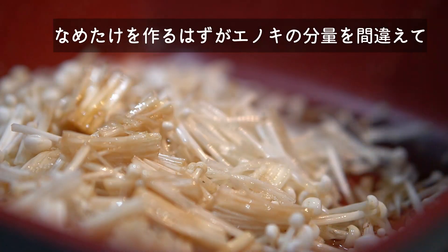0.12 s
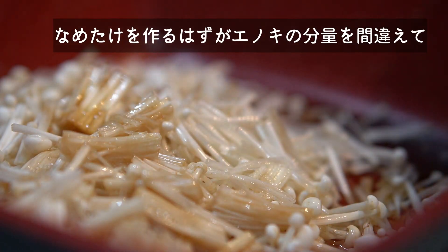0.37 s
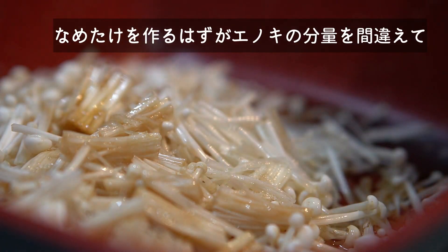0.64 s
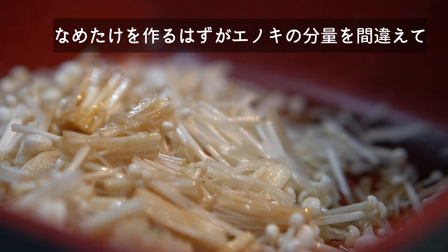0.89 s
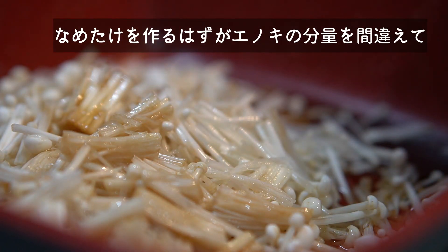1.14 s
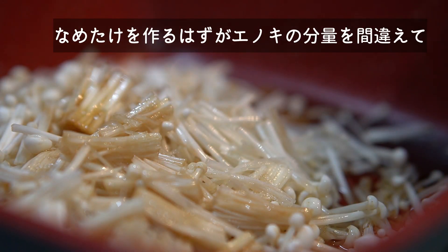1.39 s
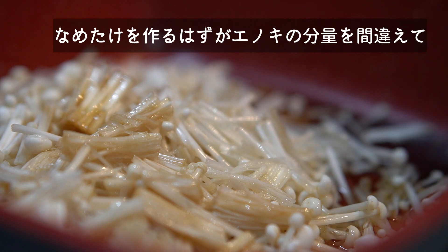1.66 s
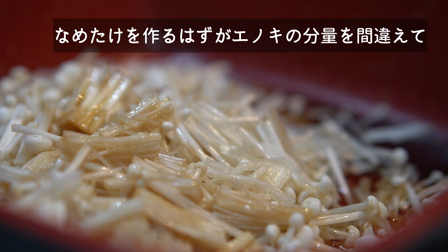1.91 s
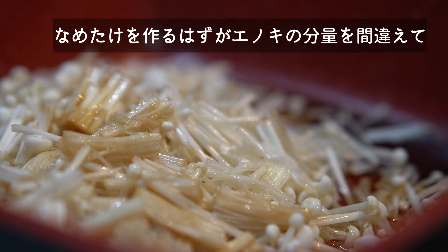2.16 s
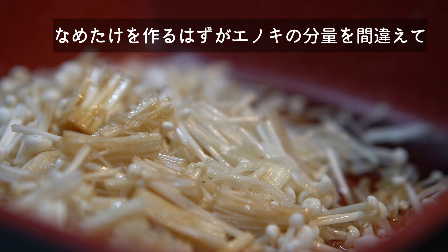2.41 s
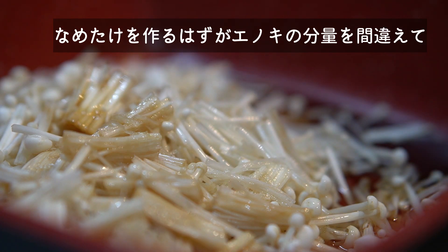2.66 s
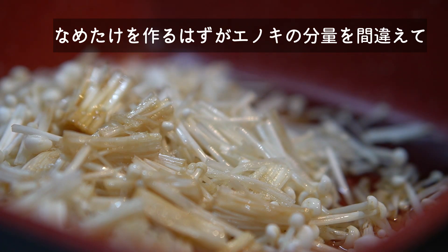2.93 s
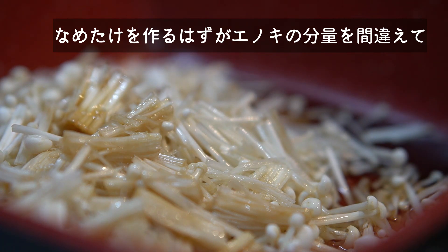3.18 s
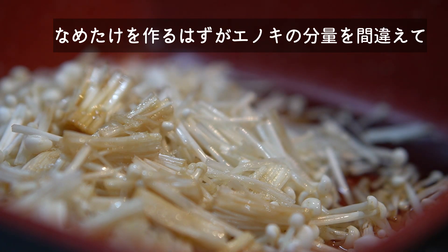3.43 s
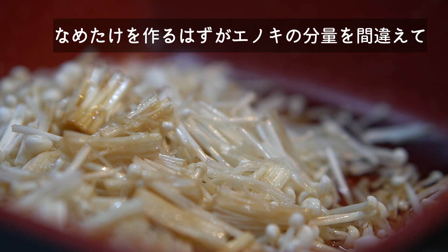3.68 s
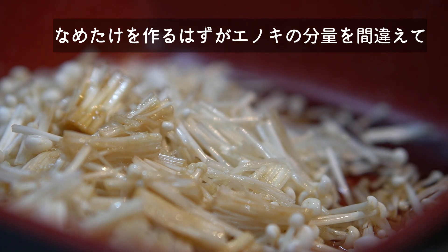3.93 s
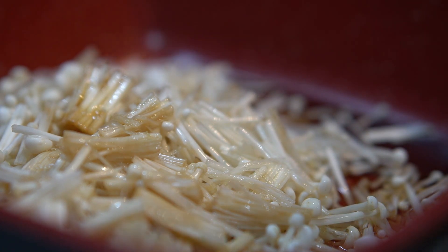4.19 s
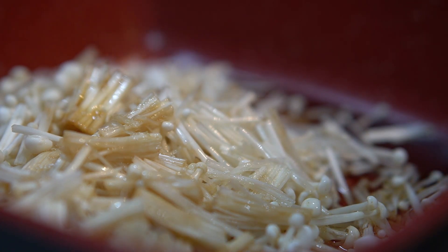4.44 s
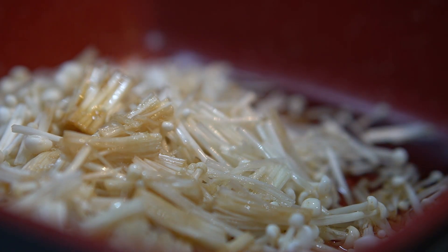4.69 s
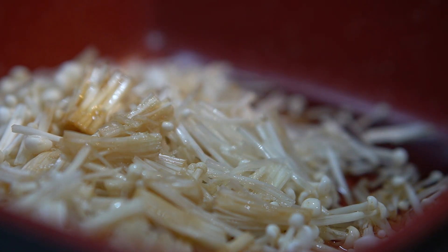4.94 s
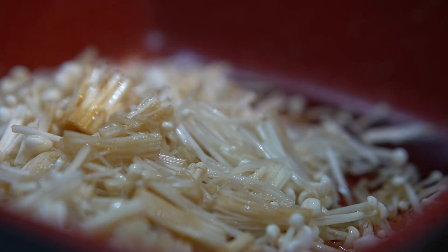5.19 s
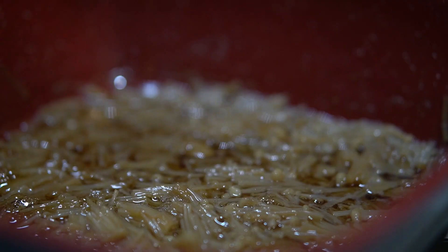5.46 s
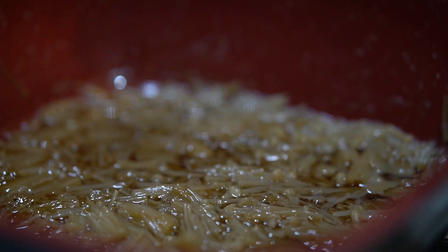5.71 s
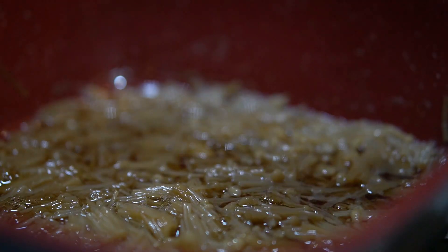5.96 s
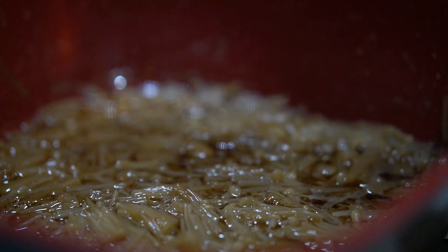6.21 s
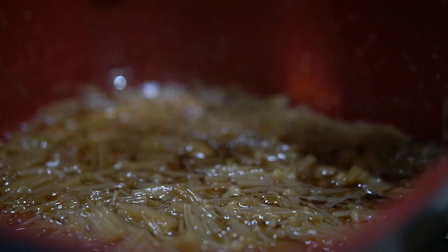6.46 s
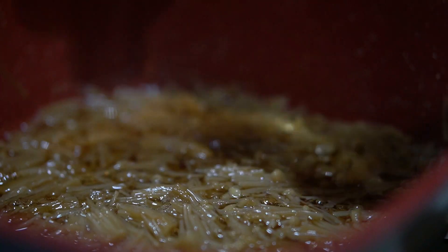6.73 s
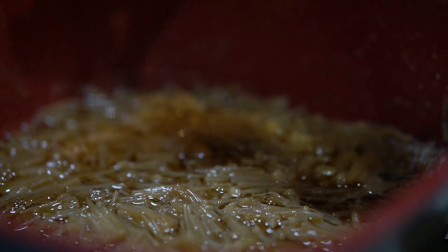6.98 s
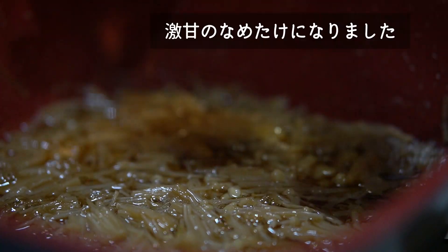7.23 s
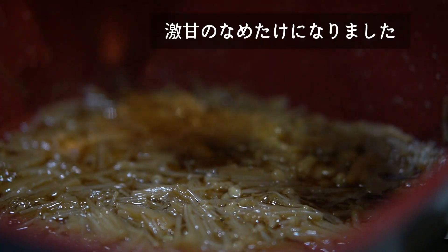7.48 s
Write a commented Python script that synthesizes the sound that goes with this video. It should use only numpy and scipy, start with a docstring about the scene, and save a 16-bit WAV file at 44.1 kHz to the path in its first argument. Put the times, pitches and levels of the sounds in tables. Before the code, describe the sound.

A quiet home kitchen with soft, airy room tone and short indoor reverberation, heard through a small microphone with little bass. A faint scuff of soles and cloth comes at 0.2 seconds. From 0.6 a drawer slides, gaining speed, then bangs shut at 1.05 with a loud clustered woody crack, a tiny steel clink and cutlery rattling away by about 1.5. A fuller scuff lands near 1.95, followed by quiet. Light, hissy rustles appear from 3.5 to 5, with a faint tap at 4.2 and a loud, dry utensil knock at 4.67. Softer taps and crisp snaps occur at 5.25. At 5.36 the sound cuts abruptly to a simmering pot: faint drumming bubbles, thin fizz and scattered tiny spits. One bright, sharp snap jumps out at 6.04, leaning right; the fizz swells slightly around 6.5 and 6.9, and the quiet simmer continues to 7.6.

```python
"""A quiet home kitchen, in two shots over one room tone. First soft soles and cloth scuff (swelling noise),
a drawer slides (noise that follows its speed), bangs shut and its cutlery rattles (ringing modes, clicks),
and a utensil is put down. Crisp snaps (bursts of bright noise, brightest on the right) begin just before
a hard cut and go on after it, where a pot simmers: bubbles drum (damped sines), the sauce fizzes and spits."""
import sys
import numpy as np
from scipy import signal
from scipy.fft import rfft, irfft, next_fast_len
from scipy.io import wavfile
from scipy.ndimage import uniform_filter1d

SR = 44100
rng = np.random.default_rng(int(sys.argv[2]) if len(sys.argv) > 2 else 0)


def transcribe(u):
    """Save the signal u as a 16-bit wav file named by the first command-line argument.

    u: samples, shape (n,) or (channels, n), limited to [-1, 1]; the rate is SR.
    q: integer samples, one column per channel.
    """
    v = np.clip(np.atleast_2d(u).T, -1, 1)
    q = np.round(v * 32767).astype(np.int16)
    wavfile.write(sys.argv[1], SR, q)


def magnitude_from_level(level_db):
    """Linear magnitude for a level in decibels (20 dB per decade)."""
    exponent = np.asarray(level_db, float) / 20
    return 10 ** exponent


N = 335601
TIME = np.arange(N) / SR
CUT_S = 5.364  # the second shot begins

# left-right likeness of diffuse room sound: hz, correlation
ALIKE_FAR = [(60, 0.76), (180, 0.98), (550, 0.42), (1650, 0.21), (4970, 0.12), (15000, 0.11)]
# left-right likeness of a nearby source: hz, correlation
ALIKE_NEAR = [(60, 0.9), (180, 1), (550, 0.83), (1650, 0.71), (4970, 0.22), (15000, 0.11)]


def unit(x):
    """Normalisation: the signal scaled to rms 1."""
    return x / np.sqrt(np.mean(x ** 2) + 1e-20)


def along(points, hz):
    """Interpolation of (hz, value) points on a logarithmic frequency axis."""
    f, v = np.transpose(points)
    return np.interp(np.log(hz + 1), np.log(f + 1), v)


def filtered(x, response):
    """Linear filtering: the spectrum of x times a response, a function of frequency in Hz."""
    m = next_fast_len(x.shape[-1] + 8192)
    spectrum = rfft(x, m) * response(np.fft.rfftfreq(m, 1 / SR))
    return irfft(spectrum, m)[..., :x.shape[-1]]


def humps(bands):
    """Resonance: a flat response with bumps or dips given as (hz, half_width_hz, level_db)."""
    return lambda f: 1 + sum((magnitude_from_level(db) - 1) / (1 + ((f - c) / w) ** 2) for c, w, db in bands)


def paired(pair, alike):
    """Interaural coherence: two unrelated signals mixed to a left and right of given likeness."""
    def weights(hz):
        angle = np.arccos(np.clip(along(alike, hz), -1, 1)) / 2
        return np.array([np.cos(angle), np.sin(angle)])

    mid, side = filtered(pair, weights)
    return np.array([mid + side, mid - side])


def rush(spectrum, patchy_db, channels=1):
    """Coloured noise of rms 1, modulated by patches of random gain in time and frequency."""
    z = signal.stft(rng.standard_normal((channels, N + 512)), nperseg=512)[2]
    field = uniform_filter1d(rng.standard_normal(z.shape[1:]), 6, 0)
    field = uniform_filter1d(field, 8, 1)
    x = signal.istft(z * magnitude_from_level(patchy_db * unit(field)), nperseg=512)[1][:, :N]
    return unit(filtered(x, lambda hz: magnitude_from_level(along(spectrum, hz))))


def wide(spectrum, patchy_db, alike=ALIKE_NEAR):
    """Spatial extent: partly coherent stereo noise from a spread-out source."""
    return paired(rush(spectrum, patchy_db, channels=2), alike)


def grains(per_second, hz, spread, turns, size_db):
    """Superposition of random damped sines that rise in pitch like bubbles; rms 1."""
    at, z, big = rng.random((3, int(per_second * N / SR)))[:, :, None]
    f = np.clip(hz * np.exp(spread * np.log(z / (1 - z))), hz / 2, 15000)
    t = np.arange(1200) / SR
    age = t * f / turns  # 1 after so many cycles of the starting pitch
    size = magnitude_from_level(-size_db * np.log(np.maximum(big, 1 / 50)))
    tone = np.sin(2 * np.pi * f * t * (1 + 0.13 * np.minimum(age, 1)))
    drops = size * tone * age * np.exp(-3 * age)
    places = (at * N).astype(int) + np.arange(1200)
    return unit(np.bincount(places.ravel(), drops.ravel(), N + 1200)[:N])


def ring(modes, t):
    """Modal vibration: damped sines (hz, level_db, t60_s), each excited at a new random strength."""
    return sum(magnitude_from_level(db + rng.normal(0, 2) - 60 * t / t60) * np.sin(2 * np.pi * hz * t)
               for hz, db, t60 in modes)


def light_body(x):
    """Radiation efficiency: small bodies radiate no bass."""
    highpass = signal.butter(N=4, Wn=300, btype="high", fs=SR, output="sos")
    return signal.sosfilt(highpass, x)


def room_tone():
    """Diffuse background field: steady coloured noise whose level drifts slowly."""
    # spectrum of the room's air: hz, density_db (per Hz, relative)
    air = [(25, -10.5), (60, 0.5), (150, -17), (300, -9.5), (400, -10.5), (450, -0.5), (520, -8),
           (800, -6.5), (1100, -3.5), (1500, -4), (2200, -7.5), (5000, -13.5), (16000, -19)]
    # drift of the level: time_s, level_db
    drift = [(0, -63.5), (1.5, -63), (2.4, -65), (3.4, -66), (4.4, -63), (5.3, -61.5), (7.61, -65.5)]
    return magnitude_from_level(np.interp(TIME, *np.transpose(drift))) * wide(air, patchy_db=0.83, alike=ALIKE_FAR)


def strokes():
    """Friction noise: each scuff swells, then decays, with its own share of dull body and hiss."""
    # scuffs of soles and cloth: start_s, level_db, t60_s, body_db, hiss_db (last two relative to the level)
    scuffs = [(0.188, -57.5, 0.57, 0, -5.5), (.46, -66.5, 0.54, -2, -1), (1.7, -69, 1.4, -18, 0),
              (1.948, -44, .44, -5.5, -18.5), (2.05, -53, 0.41, -0.5, -11), (2.155, -57.5, 0.41, -3, -21),
              (2.43, -73.5, 0.66, -3, 6), (3.53, -60.5, 0.78, -9.5, 1), (3.64, -72, 0.71, 2, 10.5),
              (3.917, -55, 0.6, -17, 5.5), (3.95, -54, 0.51, -27, 3), (4.17, -56, 0.38, -10, -5),
              (4.2, -56, 0.23, -17, -6.5), (4.5, -73, 1.36, -22, 8), (4.909, -55.5, 0.63, -20, 6.5),
              (4.945, -54, 0.55, -24, 5.5)]
    # spectrum of the main part: hz, density_db (per Hz, relative)
    core = [(500, -37), (900, -16), (1300, -2.5), (2100, 2.5), (2900, -8), (4200, -9.5), (6000, -23),
            (9000, -45)]
    # spectrum of the dull body: hz, density_db (per Hz, relative)
    body = [(120, -49), (230, -8), (320, -9), (450, -6.5), (560, -3), (650, 4.5), (780, -7), (1050, 1),
            (1600, -34)]
    # spectrum of the hiss: hz, density_db (per Hz, relative)
    hiss = [(1500, -14), (3000, 3), (5000, 1.5), (8000, -1.5), (12000, -5.5), (16000, -12)]
    power = np.zeros((3, N))
    for s, db, t60, body_db, hiss_db in scuffs:
        rise = 0.051 * t60
        swell = np.sin(np.pi / 2 * np.clip((TIME - s) / rise, 0, 1)) ** 2
        fall = magnitude_from_level(-60 * np.maximum(TIME - s - rise, 0) / t60)
        levels = magnitude_from_level(db + np.array([[0], [body_db], [hiss_db]]))
        power += (levels * swell * fall) ** 2
    parts = zip(power, (core, body, hiss), (1.5, 2, .6))
    return sum(np.sqrt(p) * wide(colour, patchy_db) for p, colour, patchy_db in parts)


def kitchen(x):
    """Reverberation: a noise tail in which each frequency decays at its own speed, most alike in the bass."""
    # reverberation time: hz, t60_s
    decay = [(200, 0.5), (1500, 0.53), (6000, 0.62), (14000, 0.47)]
    hz, t, z = signal.stft(rng.standard_normal((2, SR * 3 // 4)), SR, nperseg=256)
    fading = z * magnitude_from_level(-60 * t / along(decay, hz)[:, None])
    tail = paired(signal.istft(fading, SR, nperseg=256)[1], ALIKE_FAR)
    tail = tail / np.linalg.norm(tail[0])
    delayed = np.pad(x, (250, 0))[None]  # samples before the first reflections
    return signal.fftconvolve(delayed, tail, axes=1)[:, :N]


def slide():
    """Sliding friction: noise grows with speed as the drawer accelerates, and falls as it slows."""
    # spectrum of the drawer's runners: hz, density_db (per Hz, relative)
    runners = [(88, -65), (150, -39.5), (303, -3), (334, -7), (601, -11), (716, -3.5), (805, -7.5),
               (1290, -1.5), (2000, -9.5), (2600, -19.5), (12200, -34), (16000, -39)]
    peak_s, speedup_s, level_db, slowing_db_per_s = .81, 0.21, -43, 139
    speed = np.clip(1 + (TIME - peak_s) / speedup_s, 0, 1)
    slowing_db = slowing_db_per_s * np.maximum(TIME - peak_s, 0)
    return speed ** 1.12 * magnitude_from_level(level_db - slowing_db) * wide(runners, patchy_db=2.5)


def knocks():
    """Impact: a blow gives a short pulse, a crack and a noisy thud, and excites the modes of the wood."""
    # blows: start_s, level_db, thud_t60_s, wood_ring_db (relative to the level), thud_pitch_hz
    blows = [(1.0531, -10, 0.15, -16, 1430), (1.061, -13, 0.13, -14, 1570),
             (1.069, -14.5, 0.069, -22, 1300), (4.212, -41.5, 0.08, -24, 1480),
             (4.6723, -9, 0.076, -44, 1550), (4.678, -16, 0.12, -27, 1420), (5.2446, -34, 0.15, -20, 1300),
             (5.275, -27.5, 0.074, -19.5, 1380), (5.283, -30.5, 0.13, -23, 1290)]
    # modes of drawer front and counter: hz, level_db, t60_s
    wood = [(689, -2.5, 0.11), (1390, 3, 0.3), (1640, -5, .16), (2330, -3, .17), (2440, -21, .15),
            (3540, -1, 0.078)]
    # spectrum of a thud: multiple of its pitch (no unit), density_db (per Hz, relative)
    thud_colour = [(.1, -50), (.2, -17.5), (.45, -6), (1, 3.5), (1.5, -0.5), (2.5, -5), (3.3, -17),
                   (3.9, -22), (6, -31.5), (11, -53.5)]
    out, t = np.zeros((2, N + SR)), np.arange(SR // 2) / SR
    for s, db, t60, ring_db, hz in blows:
        noise = paired(rng.standard_normal((2, len(t))), ALIKE_NEAR)
        points = [(m * hz, g) for m, g in thud_colour]
        thud = unit(filtered(noise, lambda f: magnitude_from_level(along(points, f))))
        pulse = magnitude_from_level(3 - 60 * t / .0045) * np.sin(2 * np.pi * hz * t)
        # the wood's ring dies under the thud's damping as well as its own
        dull = magnitude_from_level(-60 * t / t60) * (magnitude_from_level(ring_db) * ring(wood, t) + magnitude_from_level(-11.0) * thud)
        crack = magnitude_from_level(-28 - 60 * t / 0.0051) * unit(np.diff(rng.standard_normal(len(t) + 1)))
        onset = 1 - np.exp(-t / 0.00026)
        out[:, round(s * SR):][:, :len(t)] += magnitude_from_level(db) * (pulse + dull + crack) * onset
    return light_body(out[:, :N])


def clinks():
    """Modal vibration of loose steel, on top of the blows."""
    # clinks: start_s, level_db
    hits = [(1.0542, -34), (1.069, -45), (4.675, -51)]
    # modes of the steel: hz, level_db, t60_s
    steel = [(7580, -3, .1), (7680, -9, .1), (12600, -14, .08), (13960, 0, .08), (14100, -6, .08)]
    out, t = np.zeros((2, N + SR)), np.arange(SR // 2) / SR
    for s, db in hits:
        out[:, round(s * SR):][:, :len(t)] += magnitude_from_level(db) * ring(steel, t)
    return light_body(out[:, :N])


def rattle():
    """Multiple collisions: jolts shake the cutlery into dense clicks and noise, coloured by the tray."""
    # the cutlery is thrown forward and back: start_s, level_db
    jolts = [(1.112, -24.5), (1.127, -27.5)]
    # spectrum of the cutlery: hz, density_db (per Hz, relative)
    cutlery = [(88, -59), (150, -31), (309, -11.5), (406, -29), (524, -8), (759, -16), (1290, -6),
               (1420, -4.5), (5570, -10), (13700, -26), (16000, -34)]
    # resonances of the cutlery tray: hz, half_width_hz, level_db
    tray = [(312, 20, 4), (1240, 100, 2.5), (2363, 260, 6), (5320, 182, 4.5)]
    rise_s, t60_s = 0.0053, 0.43
    clicks = np.abs(grains(300, hz=498.3, spread=0.57, turns=1.6, size_db=-2))
    shake = wide(cutlery, patchy_db=2.0) * (3.5 + 0.37 * clicks)
    ages = [(np.maximum(TIME - s, 0), db) for s, db in jolts]
    level = sum(magnitude_from_level(db - 60 * t / t60_s) * np.minimum(t / rise_s, 1) ** 2 for t, db in ages)
    return level * unit(filtered(shake, humps(tray)))


def snaps():
    """Transient noise: bright bursts, strongest about their centre; the fainter, the softer their start."""
    # crisp snaps and spits: start_s, level_db, centre_hz, t60_s, broad_db (noise around the centre)
    bursts = [(5.2452, -31.5, 4500, 0.13, 11), (5.2533, -31.5, 8040, 0.065, -15),
              (5.4435, -51.5, 11300, 0.066, -8), (5.458, -42, 1550, 0.068, -14),
              (5.534, -43, 8400, 0.07, -11), (5.5688, -45.5, 4100, .058, -6),
              (5.694, -47, 5030, 0.082, -19), (5.772, -42, 4450, 0.14, -10),
              (5.7894, -45.5, 9400, .076, -2), (5.913, -41, 4770, 0.075, -20),
              (5.989, -42.5, 11000, 0.091, 6), (5.996, -39, 5100, 0.24, -8), (6.0114, -45, 8400, .092, 0),
              (6.0378, -21, 12600, 0.059, -15), (6.0395, -27, 4500, 0.091, -17),
              (6.0435, -26.5, 14280, 0.12, 2), (6.10, -47, 3130, .15, -20),
              (6.165, -47, 3470, 0.042, -18.5), (6.235, -44.5, 14000, .1, -10),
              (6.2756, -43, 4700, 0.18, 2), (6.2994, -42.5, 11400, 0.14, -15),
              (6.4423, -44.5, 14400, 0.064, -13), (6.612, -46, 2210, .03, -12),
              (6.6967, -49, 5440, 0.042, -14), (7.104, -44, 1300, 0.038, -23),
              (7.227, -46.5, 8400, 0.031, -12)]
    # bands in which they ring: hz, half_width_hz, level_db
    bands = [(2480, 86, 5), (3240, 100, 5), (4500, 570, 6), (5830, 240, 5.5), (8750, 360, 8),
             (11000, 380, 7.5), (12600, 200, -6), (15500, 300, 1)]
    # balance, the brightest part being on the right: hz, left_over_right_db
    balance = [(1500, -3), (5000, 2.5), (9000, -0.5), (13000, -10.5)]
    half_width_hz = 230  # of the ringing centre
    out, t = np.zeros((2, N + SR)), np.arange(SR // 4) / SR

    def broad(f):
        return humps(bands)(f) * f ** 2 / (f ** 2 + 1200 ** 2) / (1 + f / 12000)

    for s, db, hz, t60, broad_db in bursts + spits():
        colour = lambda f: magnitude_from_level(broad_db) * broad(f) + 1 / (1 + ((f - hz) / half_width_hz) ** 2)
        burst = unit(filtered(paired(rng.standard_normal((2, len(t))), ALIKE_NEAR), colour))
        attack = t60 * np.interp(db, [-45, -30], [.035, .006])
        envelope = magnitude_from_level(db - 5.5 - 60 * t / t60) * (1 - np.exp(-t / attack))
        out[:, round(s * SR):][:, :len(t)] += envelope * burst
    return filtered(out[:, :N], lambda f: magnitude_from_level(np.outer([.5, -.5], along(balance, f))))


def spits():
    """Poisson process: faint spits at random moments of the simmer, as rows like those of the snaps."""
    per_second, floor_db, spread_db, broad_db = 8, -56, 1.5, -7
    low_hz, high_hz, mean_t60_s = 1300, 9500, .04
    span = N / SR - CUT_S
    when, size, pitch, life = rng.random((round(span * per_second), 4)).T
    start = CUT_S + np.cumsum(-np.log(when)) / per_second
    level = floor_db - spread_db * np.log(size)
    centre = low_hz * (high_hz / low_hz) ** pitch
    rows = zip(start, level, centre, mean_t60_s * (.5 + life))
    return [(*row, broad_db) for row in rows if row[0] < N / SR]


def bubbling():
    """Bubble resonance: many small bubbles merge into a murmur in the pot, and a few stand out."""
    # spectrum of the murmur: hz, density_db (per Hz, relative)
    murmur = [(90, -54), (150, -23.5), (340, -13.5), (470, -8), (590, -7), (690, 0), (800, -5.5), (980, -7),
              (1350, -7), (2200, -16.5), (3000, -18.5), (4000, -45)]
    bubbles = grains(300, hz=1300, spread=0.284, turns=2.9, size_db=4)
    return magnitude_from_level(-59.5) * (wide(murmur, patchy_db=1.5) + 0.19 * bubbles)


def fizz():
    """Bursting films: the surface of the sauce hisses, strewn with tiny damped crackles."""
    # spectrum of the hiss: hz, density_db (per Hz, relative)
    surface = [(880, -24), (1500, -1.5), (2720, -9), (3520, -1.5), (4640, -14), (5770, -9), (15100, -29),
               (16000, -19)]
    # rise and fall of the fizz: time_s, level_db
    course = [(5.4, -64), (5.8, -63.5), (6.2, -65), (6.5, -61), (6.8, -66.5), (6.92, -59), (7.1, -64),
              (7.61, -63)]
    crackle = grains(300, hz=5000, spread=0.33, turns=2.5, size_db=2.6)
    level = magnitude_from_level(np.interp(TIME, *np.transpose(course)))
    return level * (wide(surface, patchy_db=2.0) + .3 * crackle)


def scene():
    """Superposition of direct and reverberant sound; a cut with a quick fade-in joins the two shots."""
    far = strokes() + slide()
    near = knocks() + clinks() + rattle()
    crisp = snaps()
    shared = room_tone() + crisp + magnitude_from_level(-10.5) * kitchen(crisp.mean(axis=0))
    first = far + magnitude_from_level(-4) * kitchen(far.mean(axis=0))
    first = first + near + magnitude_from_level(-7.0) * kitchen(near.mean(axis=0))
    fade = np.clip((TIME - CUT_S) / 0.029, 0, 1)  # over 29 ms
    return np.where(TIME < CUT_S, shared + first, fade * (shared + bubbling() + fizz()))


def band_limit(x):
    """A steep low-pass at the top of the band."""
    return signal.sosfilt(signal.butter(12, 16640, fs=SR, output="sos"), x)


def record(dry):
    """Band limitation: a small microphone with a steep bass cut and a sharp upper limit."""
    low_hz, top_hz = 153, 15750
    bass_cut = signal.butter(N=4, Wn=low_hz, btype="high", fs=SR, output="sos")
    mix = filtered(signal.sosfilt(bass_cut, dry), lambda hz: hz < top_hz)
    return band_limit(mix)


dry = scene()
out = record(dry)
transcribe(out)
```